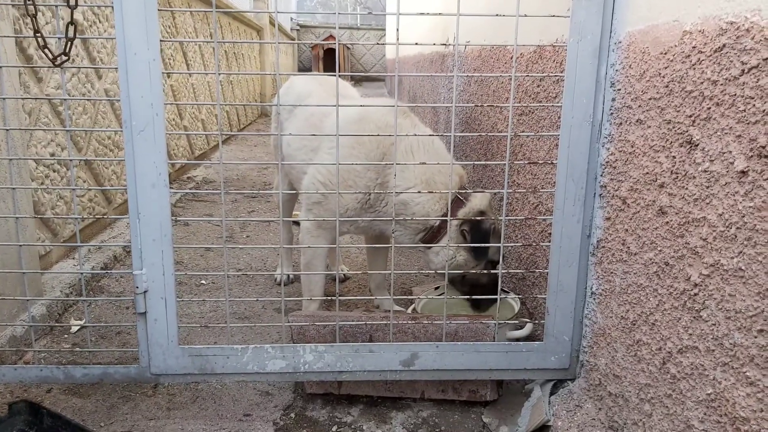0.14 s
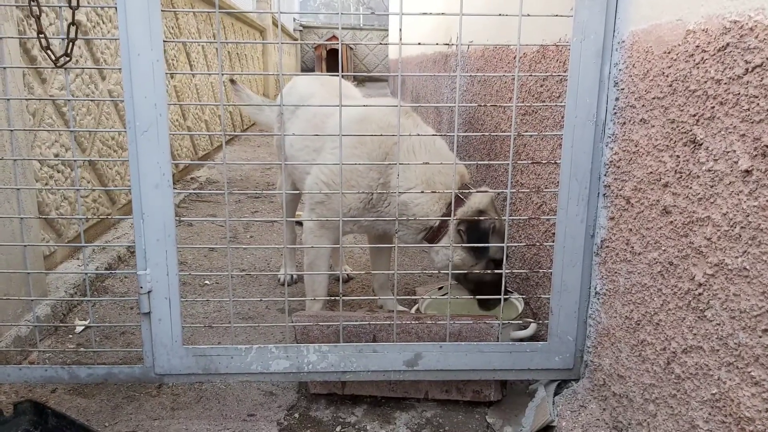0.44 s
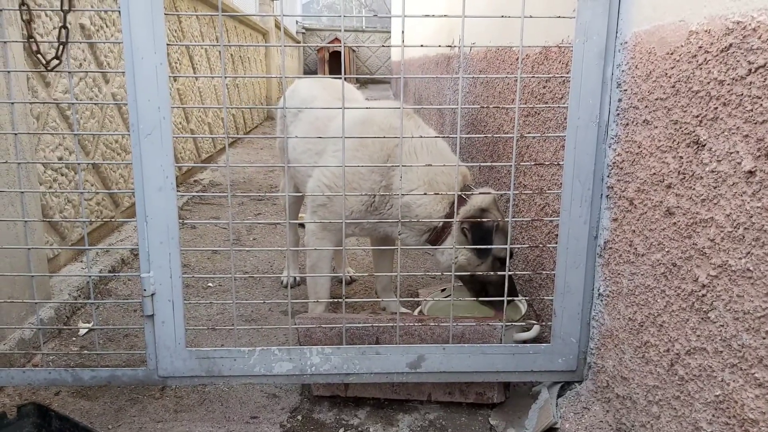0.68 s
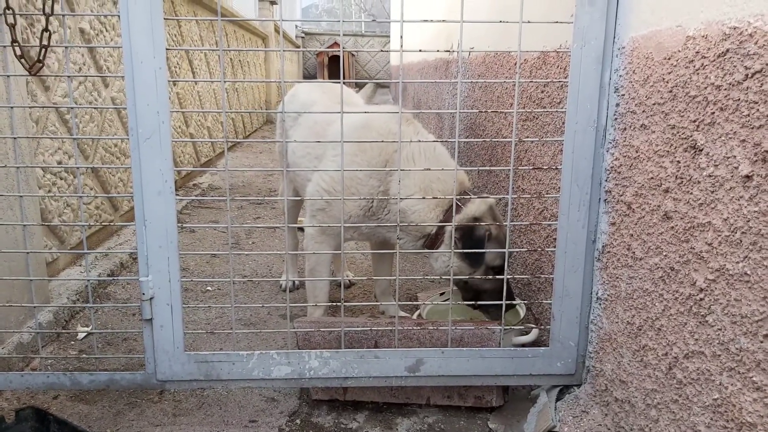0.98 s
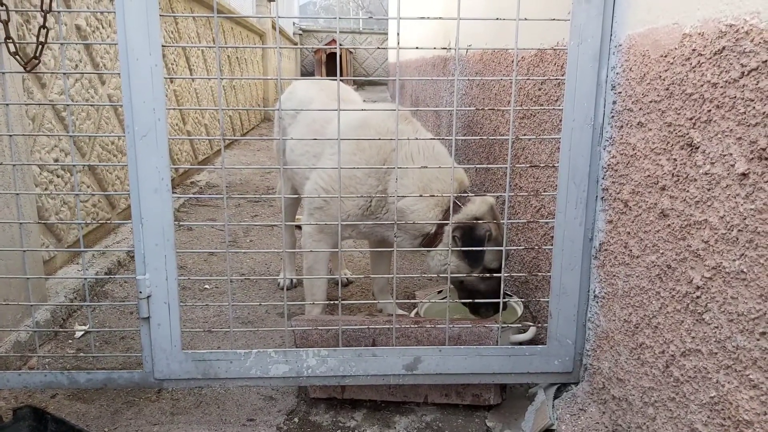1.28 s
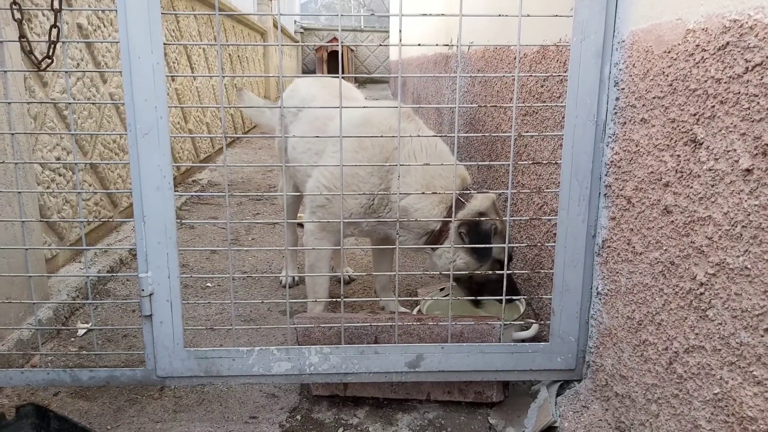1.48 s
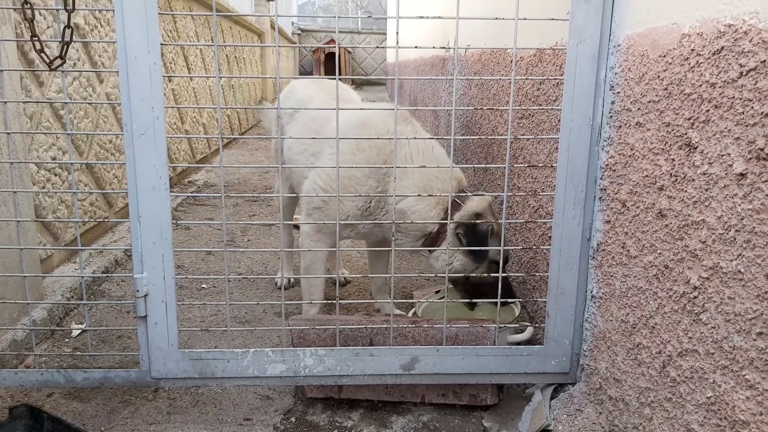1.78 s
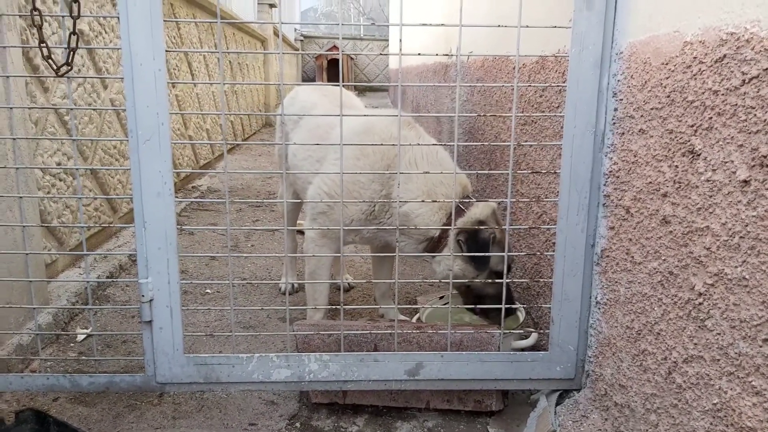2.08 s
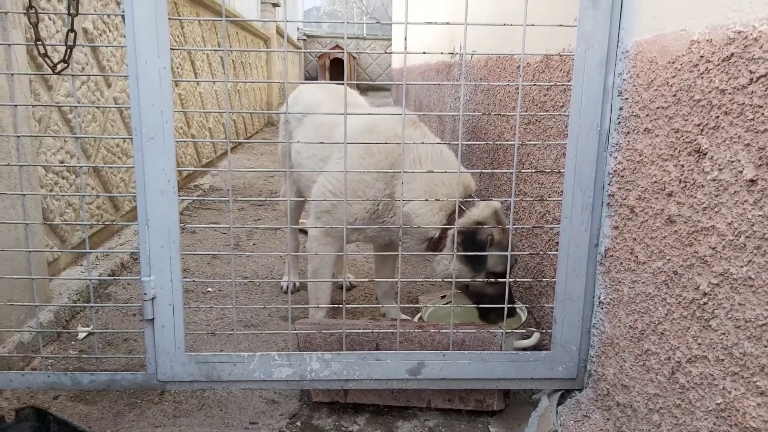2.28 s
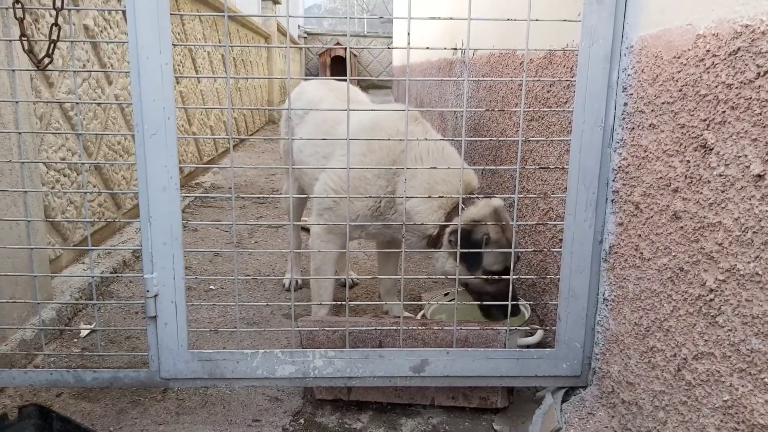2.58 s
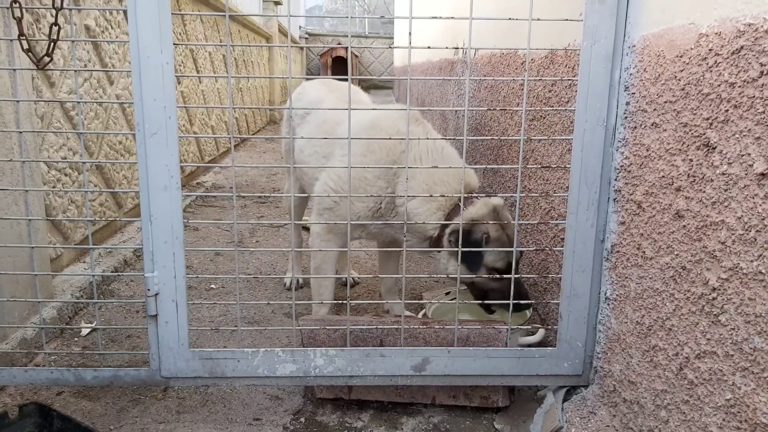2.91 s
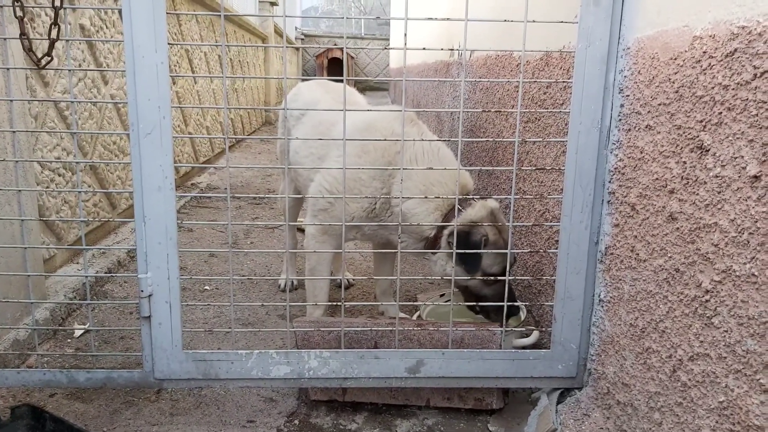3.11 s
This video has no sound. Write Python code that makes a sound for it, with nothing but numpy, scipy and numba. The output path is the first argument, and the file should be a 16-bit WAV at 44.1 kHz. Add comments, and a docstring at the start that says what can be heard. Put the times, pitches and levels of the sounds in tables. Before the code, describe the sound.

Steady wet lapping of a big dog drinking, with plops, smacks and drips in a walled pen.

```python
"""In a narrow walled pen, a large dog laps water from a bowl, a metre or two from two microphone ports.
Each tongue stroke stirs up gurgles and fizz, with plops, wet smacks and drips: all are short ringing
bubbles whose pitch can rise as they fade. Spray is tiny ringing drops mixed with shaped hiss.
The walls echo the water. Wind (low noise and ringing thumps) buffets the ports over a faint noise hush."""
import sys
import numpy as np
from scipy import signal
from scipy.fft import rfft, irfft
from scipy.io import wavfile
from scipy.ndimage import uniform_filter1d
from numba import njit

SR = 44100
rng = np.random.default_rng(int(sys.argv[2]) if len(sys.argv) > 2 else 0)


def wav_record(signal):
    """Record a signal, one row per channel, as 16-bit PCM in the file named by sys.argv[1]."""
    frames = np.transpose(np.atleast_2d(signal))
    bounded = np.clip(frames, -1, 1)
    # unit amplitude maps onto the largest positive 16-bit level
    quanta = np.round(bounded * 32767).astype(np.int16)
    wavfile.write(sys.argv[1], SR, quanta)


def amplitude_ratio(level_db):
    """Convert a level in decibels to the matching linear amplitude (field) ratio."""
    exponent = np.asarray(level_db, float) / 20
    return 10 ** exponent


N = 143325  # length in samples

# All table levels are starting levels: the functions below may trim or scatter them.
# colour of the outdoor hush [f/Hz, level/dB]
HUSH_COLOUR = [(120, -22), (250, 3), (520, 4.5), (1350, -9.5), (2100, -3.5), (3000, -13.5), (7000, -20),
               (16000, -32)]
# treble level of the hush over time [t/s, level/dB]
HUSH_TREBLE = [(0, -66.5), (.3, -67), (1.4, -71.5), (2.82, -73.5), (3.25, -59)]
# colour of the wind [f/Hz, level/dB]
WIND_COLOUR = [(20, -25), (50, 1.5), (100, 4), (170, -8), (350, -1.5), (700, -61)]
# strength of the wind on the ports over time [t/s, level/dB]
WIND_GUSTS = [(0, -54), (.22, -41.5), (.32, -56), (.45, -33), (.56, -59), (.72, -44), (.76, -81),
              (.935, -34.5), (1.0, -40), (1.16, -41.5), (1.30, -90), (2.14, -53), (2.30, -80),
              (2.37, -39.5), (2.68, -38), (2.80, -57.5), (2.85, -34), (2.92, -57), (2.99, -35.5),
              (3.25, -49.5)]
# tongue strokes [t/s, length/s, gurgle level/dB, fizz level/dB]
TONGUE_STROKES = [(0.033, 0.18, -43, -52.5), (0.375, 0.12, -43, -51), (0.756, 0.12, -41.5, -54.5),
                  (1.091, 0.15, -43.5, -53), (1.494, 0.18, -47.5, -59), (1.814, 0.15, -44.5, -55),
                  (2.21, 0.17, -44.5, -55.5), (2.511, 0.17, -41.5, -53), (2.939, .18, -47, -57.5)]
# colour of the spray [f/Hz, level/dB]
SPRAY_COLOUR = [(900, 9), (1300, -2), (2100, 2.5), (3000, -4.5), (5500, -5), (8500, -12.5), (16000, -12.5)]
# bursts of spray [t/s, level/dB]
SPRAY_BURSTS = [(0.099, -36.5), (0.1775, -37.5), (0.408, -37.5), (0.442, -34.5), (0.5, -47.5), (0.838, -35),
                (0.903, -34.5), (0.98, -48.5), (1.1696, -32.5), (1.2331, -38.5), (1.508, -46),
                (1.583, -41.5), (1.6506, -43.5), (1.887, -38.5), (1.956, -41), (2.297, -38),
                (2.3565, -40.5), (2.53, -39.5), (2.6243, -38), (3.029, -36), (3.086, -33.5)]
# air pockets trapped by the tongue [t/s, level/dB, f/Hz]
AIR_POCKETS = [(0.052, -30, 402), (0.117, -15.5, 745), (0.145, -13, 669), (0.159, -21.5, 580),
               (0.457, -16, 664), (0.48, -21, 540), (0.603, -23.5, 385), (0.769, -30.5, 490),
               (0.784, -21, 815), (0.841, -23, 470), (0.859, -32, 780), (0.876, -17.5, 548),
               (1.174, -21, 450), (1.182, -10, 660), (1.238, -27.5, 705), (1.509, -22.5, 547),
               (1.586, -13.5, 704), (1.619, -24.5, 396), (1.649, -23.5, 704), (1.721, -32, 298),
               (1.887, -15, 730), (1.918, -18.5, 588), (2.23, -26, 500), (2.317, -15.5, 583),
               (2.53, -21.5, 396), (2.634, -16, 648), (2.954, -25, 441), (3.028, -13, 798),
               (3.049, -21, 466), (3.093, -21.5, 840)]
# wet smacks of tongue and lips [t/s, level/dB, f/Hz]
WET_SMACKS = [(0.1191, -25, 1960), (0.179, -26, 1950), (0.391, -34, 1930), (0.5008, -18.5, 3150),
              (0.5032, -16.5, 2290), (0.612, -31.5, 1300), (0.9045, -27, 1975), (1.1922, -28.5, 2300),
              (1.2326, -24.5, 2150), (1.5873, -31, 2230), (1.6418, -28, 1460), (1.8392, -26, 2570),
              (1.9694, -25, 2480), (2.362, -33, 2120), (2.536, -14.5, 1906), (2.6768, -25.5, 1810),
              (3.0959, -27, 2660)]
# single drops falling from the muzzle [t/s, level/dB, f/Hz]
MUZZLE_DROPS = [(.264, -33, 2680), (.299, -44, 1930), (.552, -36.5, 2000), (1.0655, -39, 1880),
                (1.62, -43, 1920), (1.723, -44.5, 1850), (1.795, -42, 1850), (1.89, -37, 1980),
                (2.099, -42, 1664), (2.393, -41, 1920), (2.494, -33.5, 1910)]
# single thumps of wind [t/s, level/dB, f/Hz, left minus right/dB]
WIND_THUMPS = [(0.935, -23, 263, 0), (1.148, -30.5, 130, 10), (2.665, -21, 205, -2.5),
               (2.72, -21.5, 242, -4.5), (2.74, -20.5, 325, -0.5), (2.842, -11, 350, 4),
               (2.983, -21.5, 297, -12.5), (3.002, -25.5, 122, -1.5)]
# echoes from the walls [delay/s, level/dB]
WALL_ECHOES = [(.0078, -3.5)]
# lead of the left port over the right [f/Hz, phase/rad]
PORT_LEAD = [(0, 1.92), (690, 0.03), (1810, 4.74), (15800, 67.6)]


def curve(table, col):
    """One column of a table, joined by straight lines to give a value at every sample."""
    a = np.array(table, float)
    return np.interp(np.arange(N) / SR, a[:, 0], a[:, col])


def unit(x):
    """Scale to rms 1, so that a level can be set afterwards."""
    return x / np.sqrt(np.mean(x ** 2))


def colour(x, points):
    """Shape the spectrum by (Hz, dB) points on a log-frequency scale, then scale to rms 1."""
    hz, db = np.array(points, float).T
    f = np.maximum(np.fft.rfftfreq(N, 1 / SR), 1)
    gain = amplitude_ratio(np.interp(np.log(f), np.log(hz), db))
    return unit(irfft(rfft(x) * gain, N))


def walk(rate):
    """A wandering value: random levels held 1 / rate s, smoothed twice, scaled to rms 1."""
    hold = int(SR / rate)
    steps = np.repeat(rng.standard_normal(N // hold + 1), hold)
    smooth = uniform_filter1d(uniform_filter1d(steps, hold), hold)
    return unit(smooth[:N])


@njit
def bubbles(start, hz, size, cycles, glide):
    """Each bubble swells over one cycle, then rings down while its pitch rises by glide per cycle."""
    out = np.zeros(N)
    for k in range(len(start)):
        i, c = int(start[k] * SR), 0.  # c counts cycles so far
        while i < N and c < 6 * cycles[k]:
            # the ring falls 8.7 dB every cycles[k] cycles
            out[i] += size[k] * min(c, 1.) * np.exp(-c / cycles[k]) * np.sin(2 * np.pi * c)
            c += hz[k] * (1 + glide * c) / SR
            i += 1
    return out


def burst(table, db, cycles, glide, count, spread_s, octaves, weaker_db):
    """Every row rings as one main bubble and count - 1 neighbours of nearby time and pitch."""
    t, level, hz = np.array(table, float).T
    r = rng.random((len(t), count, 4))
    r[:, 0] = 0.016, 0.51, 0.036, 0.85  # the main bubble stays close to its row
    late, detune, chance, ring = np.moveaxis(r, 2, 0)
    start = t[:, None] + spread_s * late
    pitch = hz[:, None] * 2 ** (octaves * (2 * detune - 1))
    # later neighbours are weaker, or stronger where weaker_db is negative
    size = amplitude_ratio(level[:, None] + db - weaker_db * (late + chance))
    return bubbles(start.ravel(), pitch.ravel(), size.ravel(), cycles * (.5 + ring).ravel(), glide)


def strokes(col, rise_s, fall_s):
    """Rise, hold and dying away of every tongue stroke, at the level in column col."""
    t = np.arange(N) / SR
    total = np.zeros(N)
    for row in TONGUE_STROKES:
        rise = np.clip((t - row[0]) / rise_s, 0, 1)
        fall = np.exp(-np.maximum(t - row[0] - row[1], 0) / fall_s)
        total += amplitude_ratio(row[col]) * rise * fall
    return total


def hush():
    """Faint outdoor hush: separate shaped noise on each port, flickering slightly in level."""
    flicker_db, flickers_per_s = 2, 25.29
    ports = np.array([colour(rng.standard_normal(N), HUSH_COLOUR) * amplitude_ratio(flicker_db * walk(flickers_per_s))
                      for _ in range(2)])
    return ports * amplitude_ratio(curve(HUSH_TREBLE, 1) + 13)  # the whole hush is set 13 dB above its treble


def wind():
    """Unrelated low noise on each port, swelling with the gusts and buffeting at random."""
    buffet_db, buffets_per_s = 4, 30
    gusts_db = curve(WIND_GUSTS, 1)
    return np.array([colour(rng.standard_normal(N), WIND_COLOUR)
                     * amplitude_ratio(gusts_db + buffet_db * walk(buffets_per_s)) for _ in range(2)])


def gurgle():
    """A random stream of small ringing air pockets while each stroke stirs the water."""
    pockets_per_s, centre_hz, octaves = 140, 588.4, 0.67
    r = rng.random((1000, 4))
    t = np.cumsum(-np.log(1 - r[:, 0])) / pockets_per_s  # random gaps
    hz = centre_hz * 2 ** (octaves * (2 * r[:, 1] - 1))
    size = amplitude_ratio(-2.2 * np.log(1 - r[:, 2]))  # a few are much louder
    x = bubbles(t, hz, size, 2.35 * (.5 + r[:, 3]), 0.02)
    return unit(x) * strokes(col=2, rise_s=0.017, fall_s=0.073)


def spray():
    """Tiny ringing droplets over hiss: a fizz through each stroke and a burst at each splash."""
    drops_per_s, scatter_db = 1500, 2.4
    r = rng.random((6000, 4))
    t = np.cumsum(-np.log(1 - r[:, 0])) / drops_per_s
    hz = 1200 * 12 ** r[:, 1]
    size = hz / 1200 * amplitude_ratio(-scatter_db * np.log(1 - r[:, 2]))
    drops = bubbles(t, hz, size, 2 + 14 * r[:, 3], 0.)
    x = colour(unit(drops) * amplitude_ratio(1.5) + rng.standard_normal(N), SPRAY_COLOUR)

    # half-octave bands, dealt into five groups, swell unevenly
    patchy_db = 3
    half_octave = np.log2(np.maximum(np.fft.rfftfreq(N, 1 / SR), 1)) * 2 // 1
    spectrum = rfft(x)
    patchy = sum(irfft(spectrum * (half_octave % 5 == k), N) * amplitude_ratio(patchy_db * walk(44.975))
                 for k in range(5))

    kicks = np.zeros(N)
    for s, db in SPRAY_BURSTS:
        kicks[int(s * SR)] = amplitude_ratio(db - 9.5)
    rise_s, fall_s = .005, .012
    t = np.arange(SR // 5) / SR
    shape = (1 - np.exp(-t / rise_s)) * np.exp(-t / fall_s)
    splashes = signal.fftconvolve(kicks, shape / shape.max())[:N]

    flicker_db, flickers_per_s = 3.5, 50
    fizz = strokes(col=3, rise_s=0.026, fall_s=0.04) * amplitude_ratio(flicker_db * walk(flickers_per_s))
    return patchy * (splashes + fizz)


def plops():
    """Air pockets trapped by the tongue ring briefly, rising in pitch."""
    return burst(AIR_POCKETS, db=-0.5, cycles=2.0, glide=.03, count=3,
                 spread_s=0.016, octaves=0.32, weaker_db=6)


def smacks():
    """Wet smacks of tongue and lips: tight clusters of many short, higher bubbles."""
    return burst(WET_SMACKS, db=2, cycles=2.6, glide=0.0036, count=14,
                 spread_s=0.011, octaves=0.62, weaker_db=11.5)


def drips():
    """Drops falling from the muzzle: longer, purer rings with one close neighbour each."""
    return burst(MUZZLE_DROPS, db=0, cycles=7, glide=0.0072, count=2,
                 spread_s=0.0033, octaves=0.042, weaker_db=12)


def wind_thumps():
    """Low thumps of wind strike both ports, about one cycle of ring each, at unequal levels."""
    rows = np.array(WIND_THUMPS, float)
    ports = []
    for side in (1, -1):  # left, right
        table = rows[:, :3].copy()
        table[:, 1] += side * rows[:, 3] / 2
        ports.append(burst(table, db=-1.6, cycles=0.97, glide=0., count=5,
                           spread_s=0.0163, octaves=0.55, weaker_db=-4.5))
    return np.array(ports)


def pen(x):
    """Slaps from the walls and a short diffuse tail; the right port hears the near sound later."""
    near = x.copy()
    for s, db in WALL_ECHOES:
        near += amplitude_ratio(db) * np.r_[np.zeros(int(s * SR)), x][:N]
    t60_s = .15  # time for the tail to fall 60 dB
    t = np.arange(SR // 2) / SR
    tails = rng.standard_normal((2, len(t))) * np.exp(-np.log(1000) * t / t60_s) * (t > .004)
    tails /= np.sqrt(np.sum(tails[0] ** 2))
    wet = signal.fftconvolve(x[None], tails, axes=1)[:, :N]
    lead = np.interp(np.fft.rfftfreq(N, 1 / SR), *np.array(PORT_LEAD, float).T)
    right = amplitude_ratio(-0.2) * irfft(rfft(near) * np.exp(-1j * lead), N)
    return np.array([near, right]) + amplitude_ratio(-13) * wet


def scene():
    """Water echoing in the pen, spray scattered wide, wind on the ports, the hush of outdoors."""
    water = gurgle() + spray() + plops() + smacks() + drips()
    scattered = amplitude_ratio(5.5) * np.array([spray(), spray()])  # separate on each port, without echo
    return hush() + wind() + pen(water) + scattered + wind_thumps()


def low_pass(x):
    """Removes everything above the highest recorded frequency."""
    return signal.sosfilt(signal.butter(12, 16320, fs=SR, output="sos"), x)


def record(dry):
    """The finished mix of both ports goes out through the low-pass that ends the treble, with no further change
    of level."""
    return low_pass(dry)


dry = scene()
out = record(dry)
wav_record(out)
```